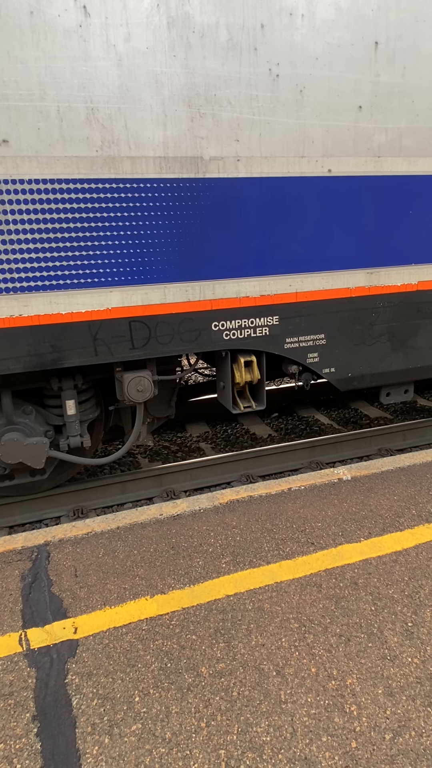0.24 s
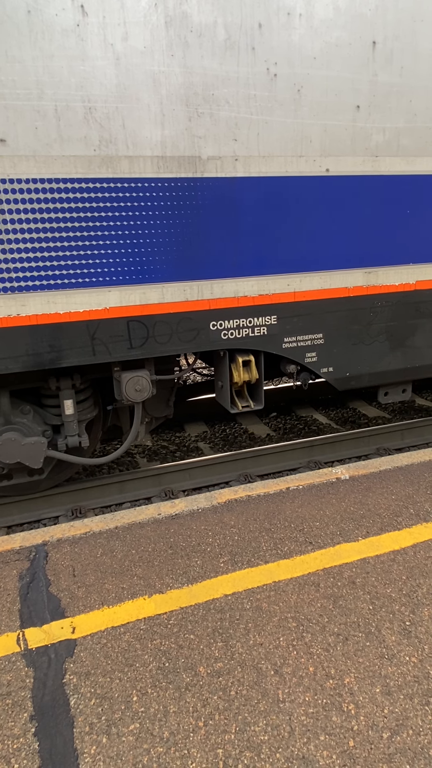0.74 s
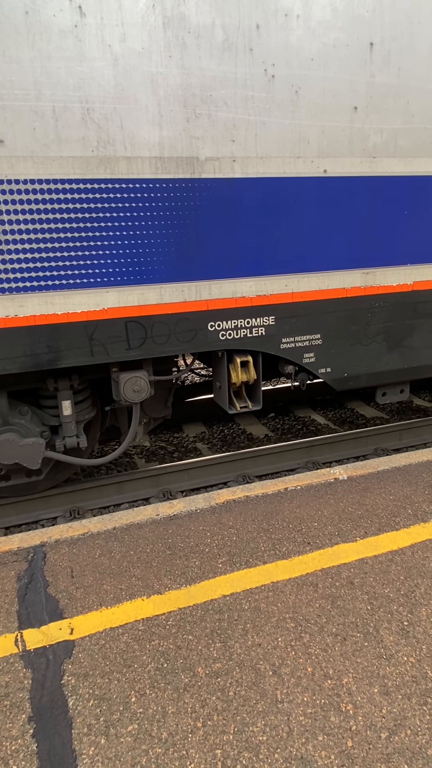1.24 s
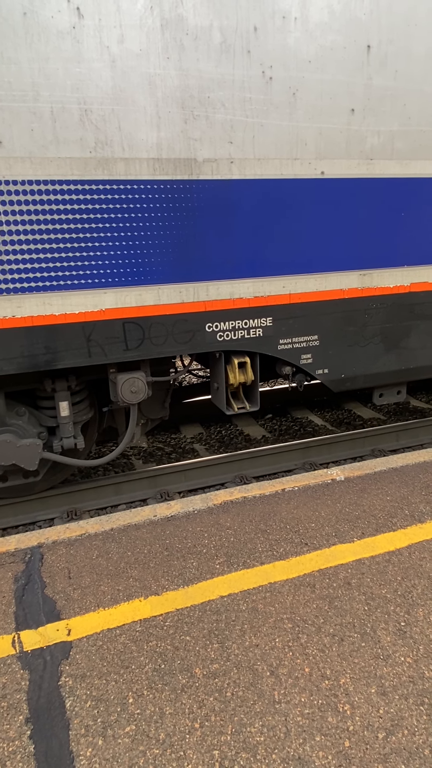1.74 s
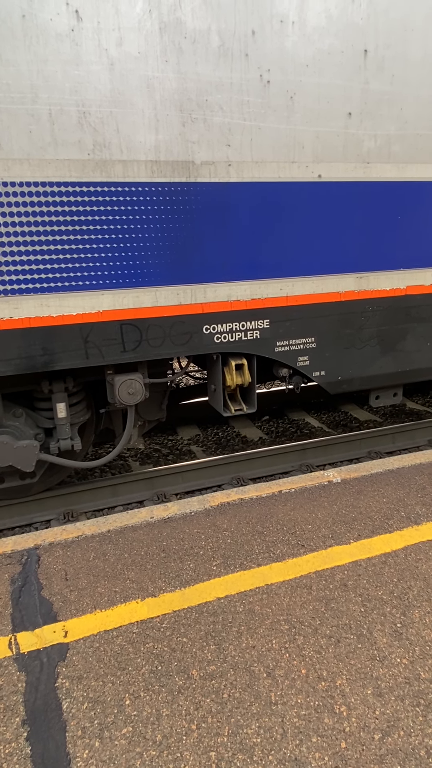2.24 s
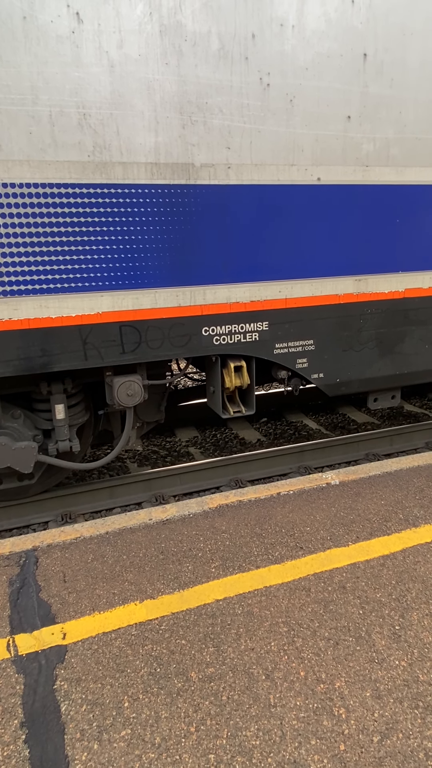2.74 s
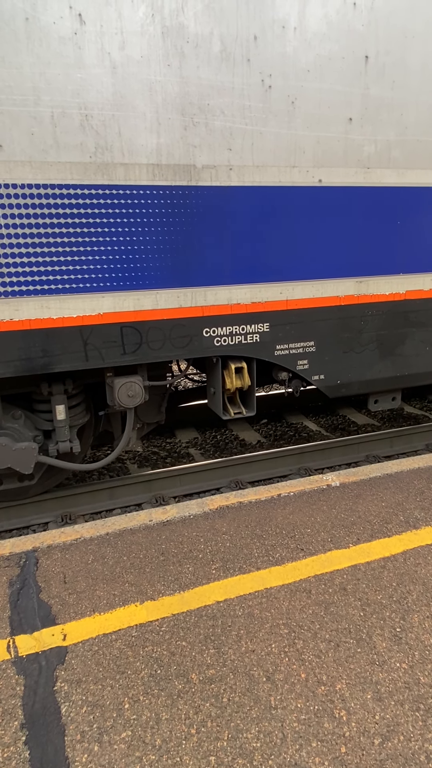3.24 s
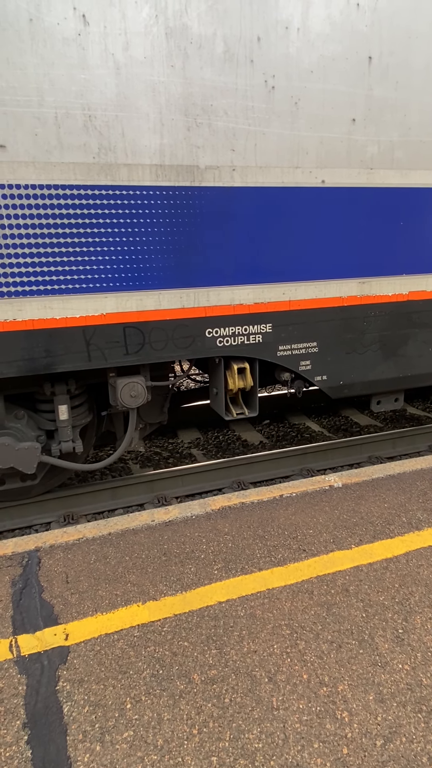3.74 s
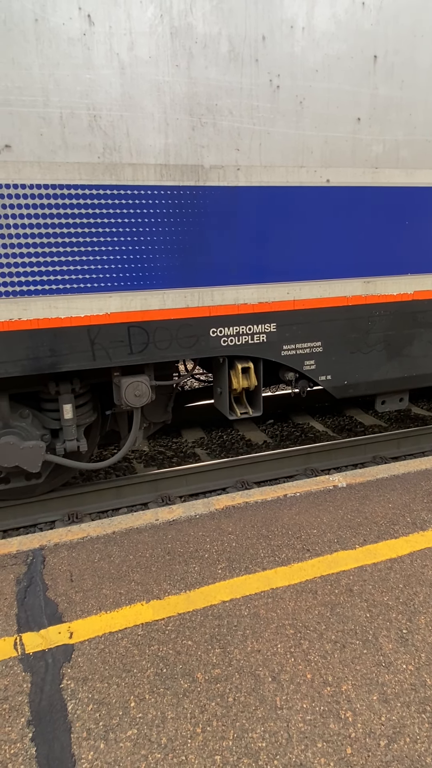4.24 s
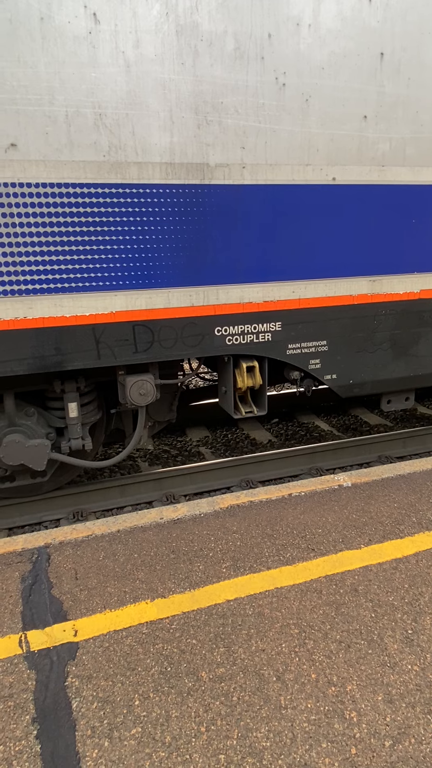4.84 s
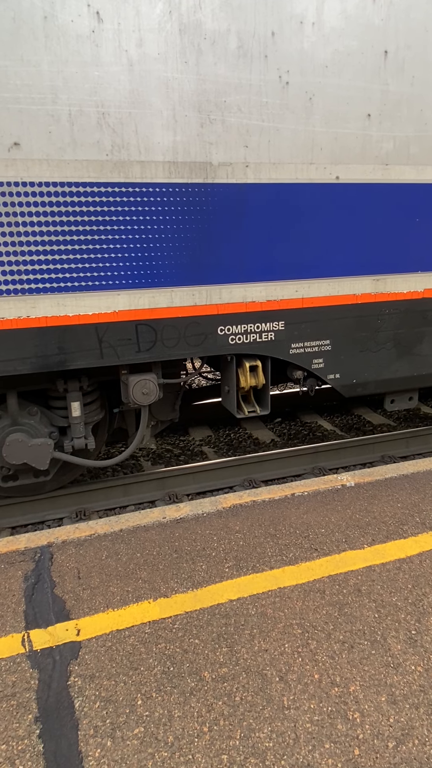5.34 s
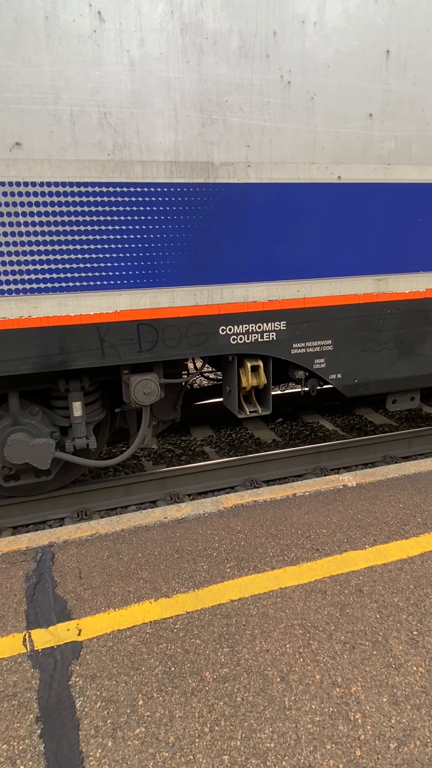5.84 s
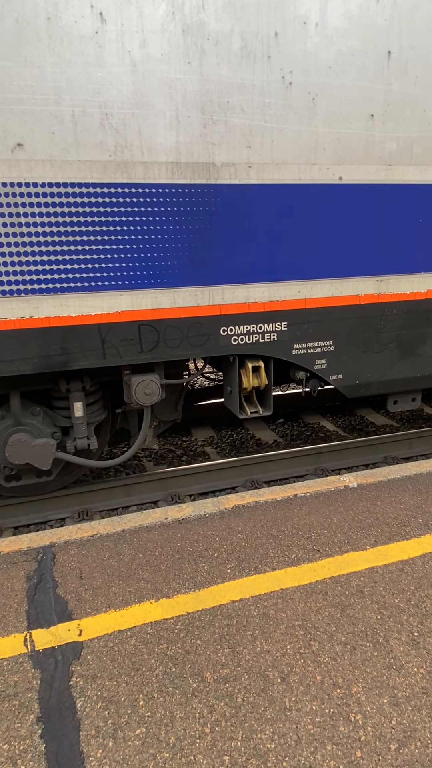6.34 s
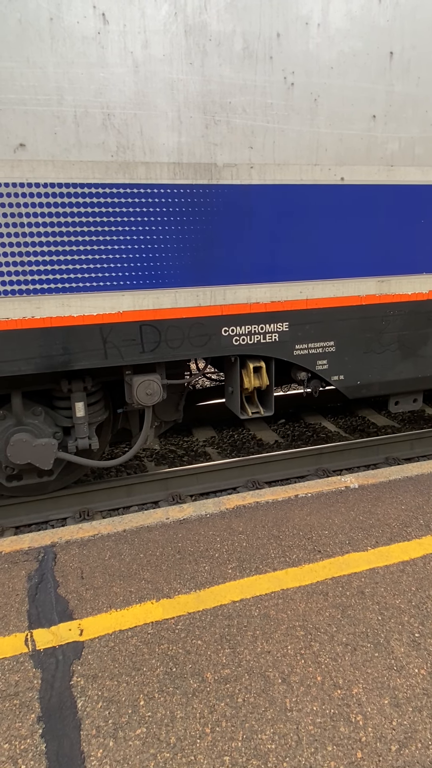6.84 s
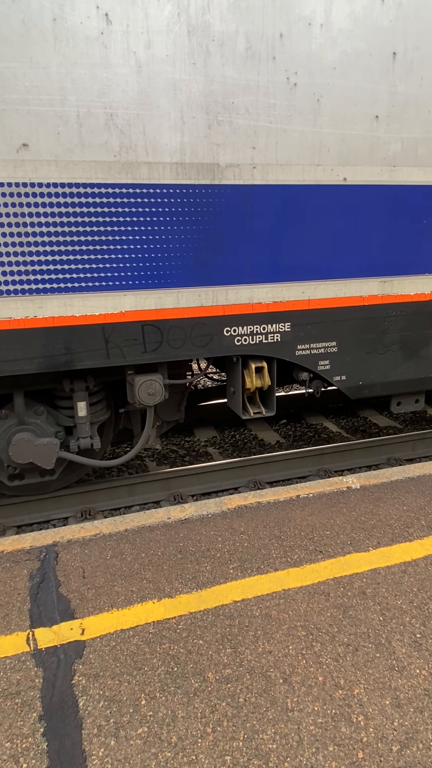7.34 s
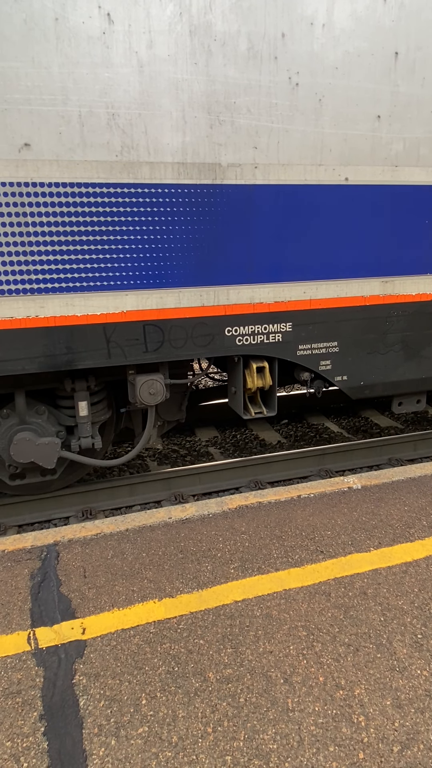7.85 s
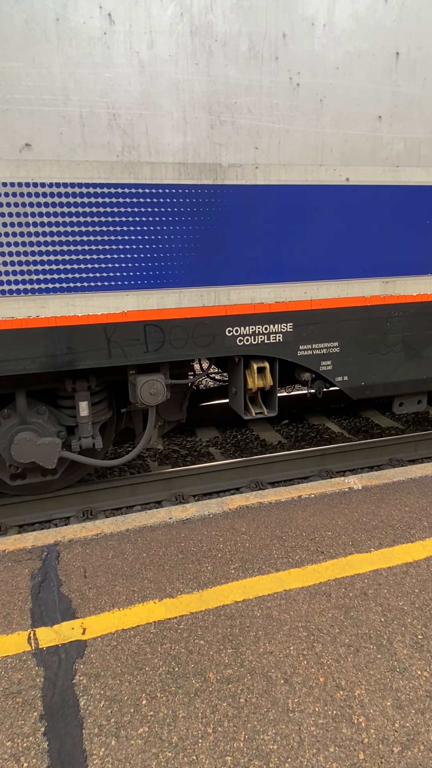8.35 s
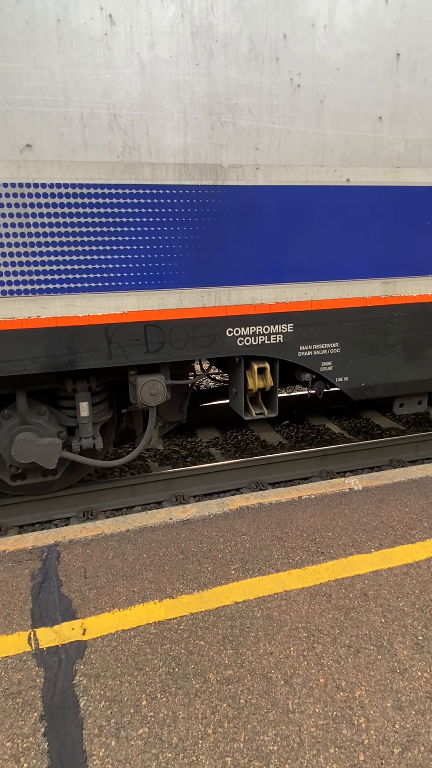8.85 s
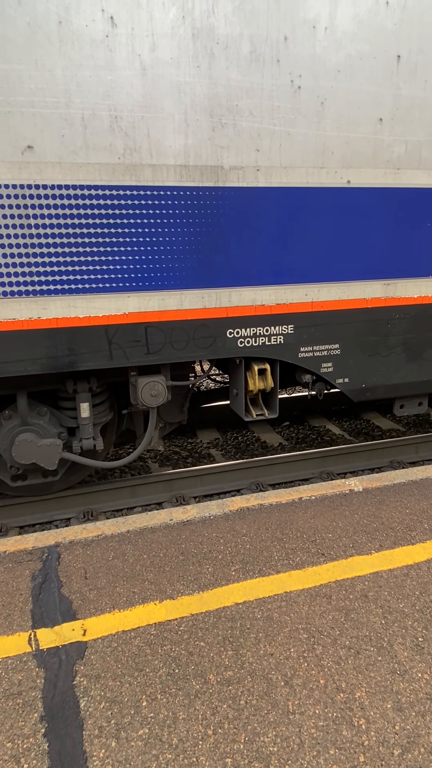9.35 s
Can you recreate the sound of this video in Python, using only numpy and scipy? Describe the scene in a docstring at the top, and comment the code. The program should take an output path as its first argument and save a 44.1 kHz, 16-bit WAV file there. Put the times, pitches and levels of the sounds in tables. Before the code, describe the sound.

Steady throbbing electrical whine and low engine hum from a parked train, with a sharp air release near the start and a faint sinking whistle later.

```python
"""Two auxiliary supplies near 60 Hz buzz and whine under a standing locomotive, heard beside its underframe.
They are stacks of overtones slipping against each other, so each overtone throbs at its own rate.
One second in, a valve dumps air: shaped noise with a puff and a hoot, then a faint, thin, sinking whistle.
Beneath lie twin fan motors (beating sines), fan rush (noise through duct resonances, a drone of uneven
level, blade tones) and the idling engine (two wavering low notes)."""
import sys
import numpy as np
from scipy import signal
from scipy.fft import rfft, irfft, next_fast_len
from scipy.io import wavfile

SR = 44100
rng = np.random.default_rng(int(sys.argv[2]) if len(sys.argv) > 2 else 0)


def transcribe(signal):
    """Save signal, clipped to [-1, 1], as a 16-bit WAV file at the path in sys.argv[1]."""
    frames = np.atleast_2d(signal).T
    limited = np.clip(frames, -1, 1)
    pcm = np.round(limited * 32767).astype(np.int16)
    wavfile.write(sys.argv[1], SR, pcm)


N = 423801
TIME = np.arange(N) / SR  # s

# pace of the first supply: t/s, f/Hz
FIRST_SUPPLY = [(0, 60.0134), (9.6, 60.0213)]
SECOND_HZ = 59.9954  # steady pace of the second supply
# overtones ringing out of the casings: order, level of the first supply/dB, left-right/dB, left lead/rad,
# second supply relative to the first/dB, t of one swell/s, level change at the first listening place/dB
WHINE = [(6, -37.5, -4, 0.0, -19, 2.67, 0), (7, -51.5, -5, 0.4, -16, 7.59, 1),
         (11, -57.0, -5, 0.9, -6, 7.43, 1), (12, -44.0, -3, 1.2, -26, 7.27, 0),
         (13, -53.5, -2, 1.0, -3, 5.25, 0), (14, -48.0, 1, 1.1, -18, 5.94, -1),
         (16, -56.0, 0, 1.0, -6, 6.17, -3), (18, -50.5, -4, 0.8, -7, 6.99, 0),
         (19, -58.5, 4, -0.6, -9, 6.29, -1), (20, -54.0, -2, -0.5, -14, 6.84, 0),
         (21, -56.5, 0, -0.4, -6, 5.41, -1), (22, -47.0, 3, -0.6, -4, 5.87, 0),
         (23, -57.5, 4, -0.4, -13, 6.21, 1), (24, -47.5, -4, -1.2, -16, 5.86, 1),
         (25, -57.5, 5, -0.6, -6, 5.31, -1), (26, -46.5, -2, -0.7, -19, 6.78, -1),
         (27, -54.5, 3, -1.2, -9, 6.0, 0), (28, -61.0, -1, 0.4, -10, 6.47, 5),
         (29, -55.5, 5, -1.3, -9, 6.1, -2), (30, -54.5, -3, -0.8, -21, 5.79, 0),
         (32, -55.0, -3, -0.3, -19, 5.49, -2), (33, -48.0, -5, -0.2, -22, 6.33, 0),
         (35, -52.5, -5, -0.2, -7, 6.3, 1), (36, -48.5, -8, 0.2, -16, 5.88, 0),
         (37, -57.5, -10, -0.7, -6, 6.24, 1), (40, -62.5, -4, 0.6, -4, 6.11, 5),
         (46, -57.5, -10, -1.7, -13, 6.16, 2), (47, -55.5, 3, -0.7, -11, 6.23, 3),
         (48, -55.5, -2, -0.7, -7, 6.17, -2), (49, -53.0, -10, -0.9, -8, 6.02, 0),
         (50, -46.0, -8, -0.6, -26, 6.37, 0), (51, -59.5, 0, -1.2, -4, 5.68, 4),
         (52, -50.0, 0, 0.7, -10, 6.17, 1), (53, -48.5, -18, -1.1, -10, 5.99, -1),
         (54, -48.5, 0, -2.3, -4, 5.96, -5), (55, -51.5, -11, -2.4, -16, 6.03, -1),
         (56, -51.0, -15, 1.0, -13, 5.61, 6), (58, -49.5, -9, -1.1, -1, 5.87, -1),
         (60, -58.0, -6, 1.4, -9, 6.26, 1), (62, -56.5, -6, 1.1, -5, 6.12, -1),
         (64, -55.0, -7, 1.1, -9, 5.98, 3), (68, -57.0, -9, 1.0, -20, 5.76, 2),
         (70, -53, -4, 0.6, -25, 6.09, -13), (71, -59.5, -7, 0.8, -7, 6.15, -2),
         (96, -64.5, -2, 1.4, -6, 6.07, -3), (106, -64, -4, 1.4, -11, 6.16, -2)]
# weaker overtones, before the even-odd and random offsets: f/Hz, level of each/dB
BUZZ = [(60, -46.5), (120, -50), (240, -50), (300, -48), (480, -63), (1000, -62), (1400, -61),
        (1950, -61.5), (2550, -66), (3450, -62.5), (3900, -67), (4300, -63.5), (4850, -72), (5600, -73.5),
        (6300, -70.5), (7000, -76), (10000, -80.5), (14000, -98)]
# their stereo position: f/Hz, left-right/dB, random spread of it/dB
BUZZ_LEAN = [(200, -2.5, 0.5), (1510, 5, -0.5), (2200, -4, 5.5), (4200, -7, 4), (6000, -1.5, 4),
             (8400, 0, 0)]
# their stereo phase: f/Hz, left lead/rad
BUZZ_LEAD = [(360, 0.06), (900, 1.1), (2100, -0.4), (3300, -1), (4200, 1.3), (5800, 1.6), (8400, np.pi)]
# depth of their throb: f/Hz, level of the second supply relative to the first/dB
THROB = [(300, -14), (1200, -8), (2200, -5.5), (2700, -3.5), (5800, -3.5)]
# the weaker overtones swell nearly together: around this time, with this random spread (s)
IN_STEP_S, STAGGER_S = 5.9, 0.12
# the listener shifts along the platform: t/s, share of the second place/0-1
LISTENER_SHIFT = [(2.1, 0), (4.9, 1)]

# body of the air jet, before the blast level: f/Hz, density/dB per Hz
JET = [(500, -95), (1500, -79), (3000, -76), (3600, -76), (4300, -73.5), (5000, -78), (5900, -71.5),
       (8400, -76.5), (11000, -88), (15600, -110)]
# fizz on top of it, before the fizz level: f/Hz, density/dB per Hz
FIZZ = [(5000, -110), (8400, -82), (9200, -76), (10500, -74.5), (11800, -77.5), (13000, -74.5),
        (14500, -80.5), (15600, -80.5)]
# low puff, before its own gain and the hoot's swell: f/Hz, density/dB per Hz
PUFF = [(80, -30), (170, 0), (300, 1), (420, -9.5), (3000, -48)]
OPEN_S, OPENING_S = 0.987, 0.021  # valve half open at, time constant of its opening
# level at that moment (dB) and fall as the pipe empties (dB per s)
BLAST_DB, BLAST_FALL_DB_PER_S = 0, 12
FIZZ_DB, FIZZ_FALL_DB_PER_S = 4.5, 16
LEAK_DB, LEAK_FALL_DB_PER_S = -20, 3.5  # the leak outlasts the blast
# hoot of the pipe: pitch, peak after the valve opens, half length to 1/e, gain of its swell
HOOT_HZ, HOOT_DELAY_S, HOOT_HALF_S, HOOT_DB = 426, 0.096, 0.055, -33.5
# whistle of the leak: start, length, fade at either end, level
WHISTLE_S, WHISTLE_LENGTH_S, WHISTLE_FADE_S, WHISTLE_DB = 3.65, 1.3, 0.22, -73
# its pitch sinks with the pressure: from, towards, time constant
WHISTLE_TOP_HZ, WHISTLE_END_HZ, SINK_S = 16500, 11400, 1

# twin fan motors: mean shaft speed at the start, its sag, difference between the two
SHAFT_HZ, SAG_HZ_PER_S, SLIP_HZ = 51.5, 0.165, 0.132
# their hum: shaft order, level of the first motor/dB, t of one swell/s
MOTOR_HUM = [(3, -42, 4.4), (4, -47.5, 5.15), (6, -49, 3.6)]

# rush of the fans, before the ducts colour it: f/Hz, density/dB per Hz
RUSH = [(15, -96), (36, -67), (62, -58), (82, -55.5), (130, -57), (270, -56), (470, -68), (800, -70),
        (1300, -77.5), (2300, -85), (3200, -83), (4800, -92.8), (9000, -97.5), (13000, -103), (15500, -116)]
# resonances and dips of the fan ducts: f/Hz, width to 1/e of the boost/Hz, boost/dB
DUCTS = [(83.5, 6.9, 1.5), (135, 12, -2.5), (260, 12, -2.5), (304.4, 11.5, 3), (333, 13, -3),
         (402, 18, 3.5), (604, 70, 0.6), (959, 28, 4.5), (1044, 100, -3), (2600, 170, -3)]
# droning duct: centre, half width to -6 dB, peak density (dB per Hz) before its level over time
DRONE_HZ, DRONE_WIDTH_HZ, DRONE_DB = 182.1, 15.4, -53.5
# level of the drone over time: t/s, level/dB
DRONE_LEVEL = [(0.1, 1), (0.35, 5), (0.65, -2.5), (1.1, 5), (1.8, -10), (2.15, -10), (2.5, -2), (3.0, -3),
               (3.5, 6.5), (3.9, -0.5), (4.3, 2.5), (4.7, -2), (5.3, 6), (5.8, -3.5), (6.8, 2.5),
               (7.4, -10), (8.1, 5.5), (8.7, -1.5), (9.3, 3.5)]
# fan blade tones: f/Hz, mean level/dB, width of the pitch wander/Hz
FAN_TONES = [(1174, -61.5, 2), (1240, -63, 1.5), (1296, -53.5, 1.5), (1351, -63, 2), (2440, -70, 1.5),
             (3640, -65, 1.5), (4220, -67, 70), (4780, -73, 70)]

# low notes of the idling engine: f/Hz, mean level/dB
ENGINE = [(40.3, -57), (58.9, -47)]
ENGINE_WAVER_HZ, ENGINE_SWAY_DB = 0.2, 2  # rms wander of pitch and level

# stereo image: f/Hz, left-right/dB, likeness/0-1, left lead/rad; opposite phase around 10 kHz
STEREO_IMAGE = [(50, 0.5, 0.99, 0), (198, -2.5, 1, 0.32), (447, -5, 0.91, 0.42), (700, -2.5, 0.82, 1.79),
                (1100, 3, 0.5, 1.43), (1800, 2, 0.6, 1.37), (3200, -5, 0.2, 2.5), (7260, -2, 0, 1.5),
                (8380, 0, 1, np.pi), (11800, 0, 1, np.pi), (14800, -1.5, 0.3, 4.5)]
EDGE_HZ = 15720  # upper band edge


def gain_of(db):
    """Decibels to amplitude."""
    return 10 ** (np.asarray(db) / 20)


def read(points, hz):
    """The columns of a table, joined by straight lines over log frequency."""
    f, *columns = np.transpose(points)
    return np.squeeze([np.interp(np.log(hz + 1), np.log(f + 1), c) for c in columns])


def follow(points):
    """The columns of a table, joined by straight lines over time."""
    s, *columns = np.transpose(points)
    return np.squeeze([np.interp(TIME, s, c) for c in columns])


def drift(rate):
    """Slow random wander of unit rms, up to about rate changes a second."""
    size, slow_sr = 2048, 200
    hz = np.fft.rfftfreq(size, 1 / slow_sr)
    slow = irfft(rfft(rng.standard_normal(size)) * np.exp(-(hz / rate) ** 2))
    return np.interp(TIME, np.arange(size) / slow_sr, slow / slow.std())


def pair(balance_db, lead):
    """Complex gains of the left and right channels, with a mean power of one."""
    left = gain_of(balance_db / 2) * np.exp(.5j * lead)
    both = np.array([left, 1 / left])
    return both / np.sqrt(np.mean(abs(both) ** 2, axis=0))


def tone(hz, turns):
    """A sine of unit rms near hz, placed in the stereo image."""
    balance_db, _, lead = read(STEREO_IMAGE, hz)
    return np.sqrt(2) * (pair(balance_db, lead)[:, None] * np.exp(2j * np.pi * turns)).real


def air(colour_db):
    """Turbulent noise with a given density over frequency, placed in the stereo image."""
    size = next_fast_len(N)
    hz = np.fft.rfftfreq(size, 1 / SR)
    balance_db, same, lead = read(STEREO_IMAGE, hz)
    same = np.clip(same, 0, 1)
    a, b = rfft(rng.standard_normal((2, size)))
    right = same * a + np.sqrt(1 - same ** 2) * b  # partly like the left
    spectra = np.array([a, right]) * pair(balance_db, lead)
    return irfft(spectra * gain_of(colour_db(hz)) * np.sqrt(SR / 2), size)[:, :N]


def repeat(partials, turns):
    """One cycle built from its overtones, played round and round at the supply's pace."""
    size = 16384
    cycles = irfft(partials, size) * size / np.sqrt(2)
    place = np.arange(size + 1) / size
    return np.array([np.interp(turns % 1, place, np.append(c, c[0])) for c in cycles])


def converters(scatter=1.5, even_db=2.0, uneven_db=1.65, wander_db=2, jitter=0.00046):
    """Each supply jolts its coils twice a cycle; the casings smear the jolts into a whining buzz."""
    order = np.arange(240)
    hz = order * SECOND_HZ
    turns = np.array([np.cumsum(follow(FIRST_SUPPLY)) / SR, SECOND_HZ * TIME])
    level_chance, lean_chance, place_chance, swell_chance, phase_chance = rng.standard_normal((len(order), 5)).T

    # the weaker overtones
    level_db = read(BUZZ, hz) + even_db * (-1) ** order  # magnetic pull favours the even orders
    level_db += uneven_db * (1 + hz / 8000) * level_chance
    lean_db, spread_db = read(BUZZ_LEAN, hz)
    balance_db = lean_db + spread_db * lean_chance
    lead = read(BUZZ_LEAD, hz)
    throb_db = read(THROB, hz)
    swell_s = IN_STEP_S + STAGGER_S * swell_chance
    first_place_db = wander_db * place_chance

    # the ringing overtones take their place
    for k, *row in WHINE:
        k = round(k)
        level_db[k], balance_db[k], lead[k], throb_db[k], swell_s[k], first_place_db[k] = row

    phase = np.exp(1j * scatter * phase_chance)
    partials = (order > 0) * gain_of(level_db) * phase * pair(balance_db, lead)
    # the supplies slip apart, so overtone k swells k times for each whole cycle of slip
    slip_at_swell = np.interp(swell_s, TIME, turns[0] - turns[1])
    second = gain_of(throb_db) * np.exp(2j * np.pi * order * slip_at_swell)
    moved, out = follow(LISTENER_SHIFT), 0
    for weights, clock in zip([1, second], turns):
        clock = clock + jitter * drift(6)
        # standing waves between train and platform colour each listening place differently
        before = repeat(partials * weights * gain_of(first_place_db), clock)
        after = repeat(partials * weights, clock)
        out = out + (1 - moved) * before + moved * after
    return out


def air_dump(sputter_db=1.0, puff_db=-23):
    """A valve opens with a puff and a short hoot of its pipe; the jet fades and dulls as the pipe empties."""
    age = TIME - OPEN_S
    opened = (1 + np.tanh(age / OPENING_S / 2)) / 2
    leak = gain_of(LEAK_DB - LEAK_FALL_DB_PER_S * age)
    jet = 0
    for colour, db, fall in [(JET, BLAST_DB, BLAST_FALL_DB_PER_S), (FIZZ, FIZZ_DB, FIZZ_FALL_DB_PER_S)]:
        flow = opened * np.hypot(gain_of(db - fall * age), leak)
        jet = jet + air(lambda hz: read(colour, hz)) * flow * gain_of(sputter_db * drift(30))
    puff = air(lambda hz: puff_db + read(PUFF, hz))
    swell = gain_of(HOOT_DB) * np.exp(-((age - HOOT_DELAY_S) / HOOT_HALF_S) ** 2)
    return jet + swell * (puff + tone(HOOT_HZ, HOOT_HZ * TIME))


def whistle(width_hz=850):
    """A narrow band of hiss that sinks in pitch as the last air leaks out."""
    age = np.maximum(TIME - WHISTLE_S, 0)
    hz = WHISTLE_END_HZ + (WHISTLE_TOP_HZ - WHISTLE_END_HZ) * np.exp(-age / SINK_S)
    fade = np.clip(np.minimum(age, WHISTLE_LENGTH_S - age) / WHISTLE_FADE_S, 0, 1)
    lowpass = signal.butter(2, width_hz / 2, fs=SR, output="sos")
    fuzz = signal.sosfilt(lowpass, rng.standard_normal((2, N)))
    carrier = np.sqrt(2) * np.sin(2 * np.pi * np.cumsum(hz) / SR)
    return gain_of(WHISTLE_DB) * fade * fuzz / fuzz.std() * carrier


def motors(twin_db=-3):
    """Two fan motors hum at nearly the same, slowly sagging speed; each shaft order beats at its own rate."""
    turns, out = np.cumsum(SHAFT_HZ - SAG_HZ_PER_S * TIME) / SR, 0
    for k, db, swell_s in MOTOR_HUM:
        k = round(k)
        slip = SLIP_HZ * (TIME - swell_s) / 2
        first = tone(k * SHAFT_HZ, k * (turns + slip))
        twin = tone(k * SHAFT_HZ, k * (turns - slip))
        out = out + gain_of(db) * (first + gain_of(twin_db) * twin)
    return out


def fans(gust_db=0.3, flutter_db=2.0):
    """Air rushing through resonant ducts, with a droning duct of uneven level and wavering blade tones."""
    def rush_db(hz):
        return read(RUSH, hz) + sum(db * np.exp(-((hz - f) / width) ** 2) for f, width, db in DUCTS)

    def drone_db(hz):
        return DRONE_DB - 20 * np.log10(1 + ((hz - DRONE_HZ) / DRONE_WIDTH_HZ) ** 2)

    out = air(rush_db) * gain_of(gust_db * drift(4.4))
    out += air(drone_db) * gain_of(follow(DRONE_LEVEL))
    for hz, db, width in FAN_TONES:
        turns = np.cumsum(hz + width / 2 * drift(4.07)) / SR
        out += gain_of(db + flutter_db * drift(4)) * tone(hz, turns)
    return out


def engine():
    """The idling engine's low notes waver a little; the upper one beats against the supply hum in slow surges."""
    out = 0
    for hz, db in ENGINE:
        level = gain_of(db + ENGINE_SWAY_DB * drift(1.5))
        turns = np.cumsum(hz + ENGINE_WAVER_HZ * drift(1)) / SR
        out = out + level * tone(hz, turns)
    return out


def scene():
    """Everything heard from the platform."""
    return converters() + air_dump() + whistle() + motors() + fans() + engine()


def record(dry):
    """The recorder's band limit: a steep low-pass."""
    lowpass = signal.firwin(1023, EDGE_HZ, window=("kaiser", 9), fs=SR)
    return signal.oaconvolve(dry, lowpass[None], "same")


dry = scene()
out = record(dry)
transcribe(out)
```